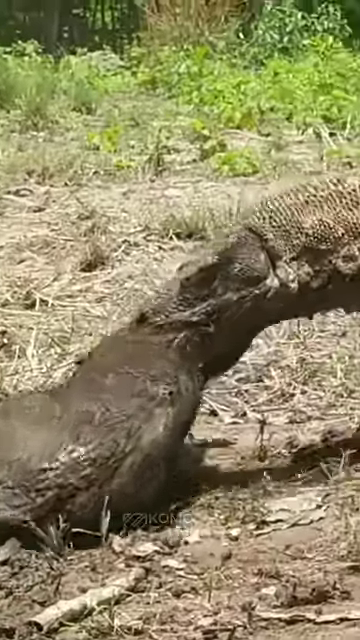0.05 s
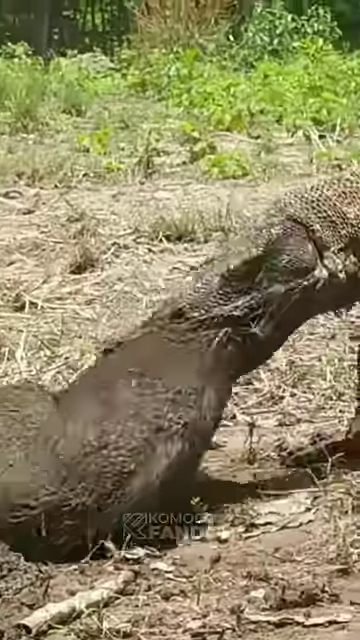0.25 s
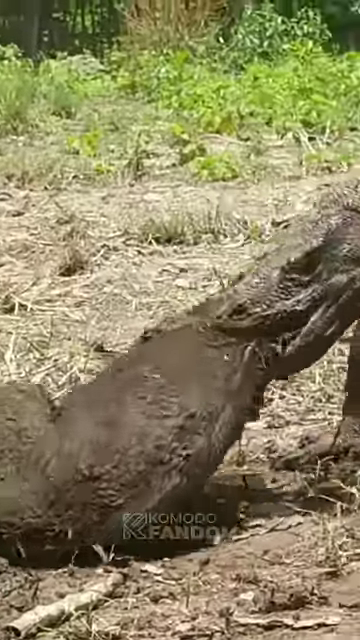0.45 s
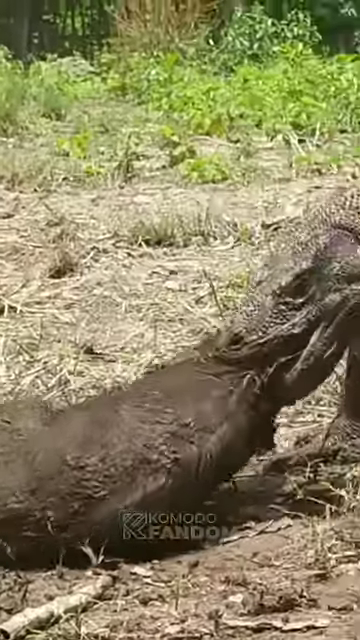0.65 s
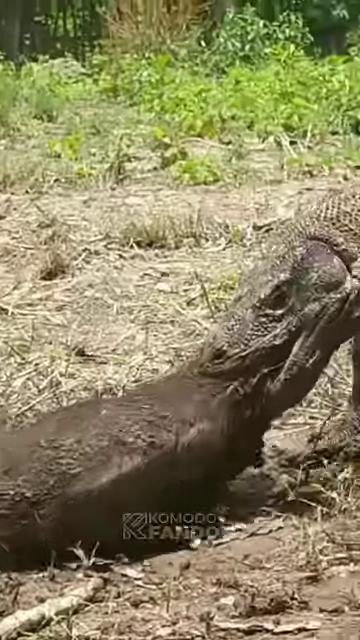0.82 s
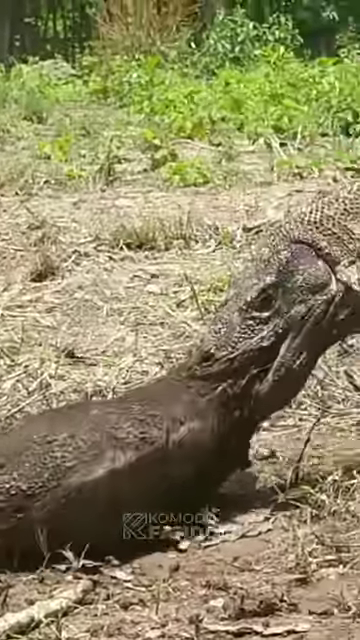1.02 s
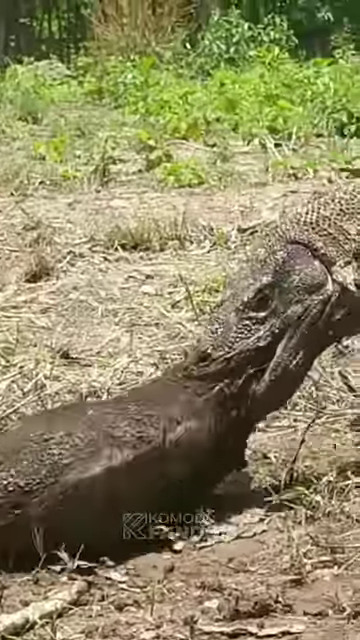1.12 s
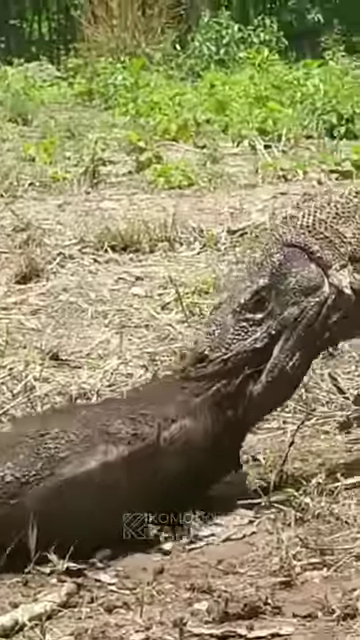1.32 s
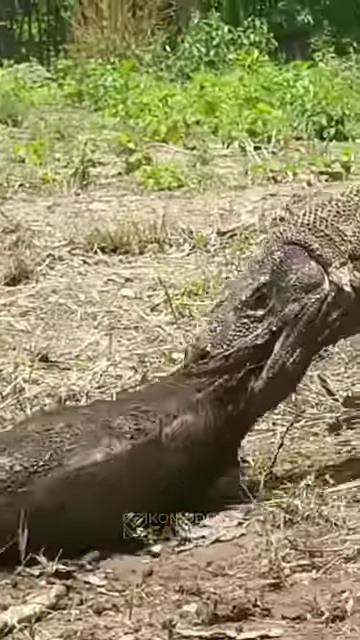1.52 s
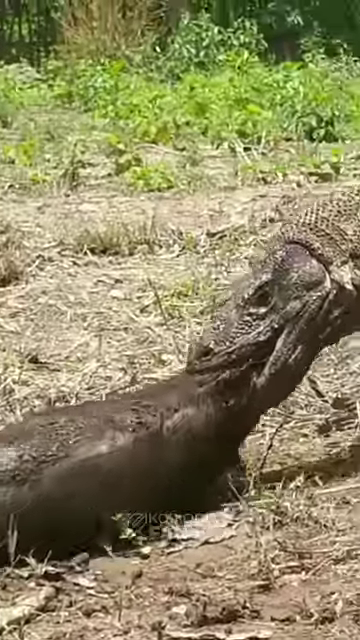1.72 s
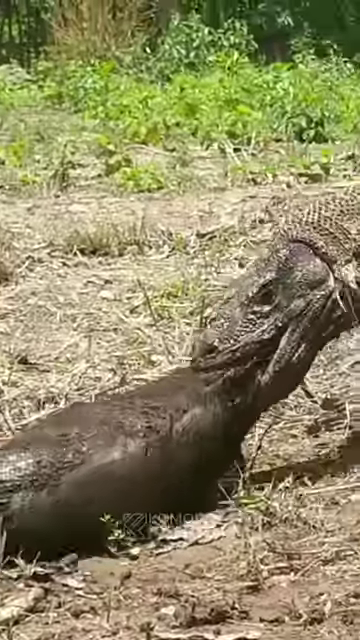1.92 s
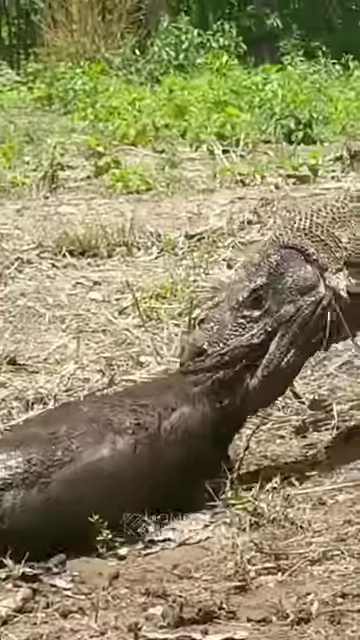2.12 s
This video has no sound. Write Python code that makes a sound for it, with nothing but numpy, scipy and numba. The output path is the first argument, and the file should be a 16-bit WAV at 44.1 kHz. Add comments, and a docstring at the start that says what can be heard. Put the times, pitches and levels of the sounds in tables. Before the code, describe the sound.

A large lizard gives a low rattling growl, then one long, breathy hiss.

```python
"""A low rattling growl, close and a little to the left, opens into one long hiss: a large lizard.
Slow flaps of its throat ring the chest and closed mouth, then dissolve into air as the wet jaws tick.
The breath rushes through the resonances of throat and mouth, buzzes and squeals as it gathers force,
whistles and stops short. Under it sit a low, even throb like a far idling engine and faint
outdoor air."""
import sys
import numpy as np
from scipy import signal
from scipy.fft import rfft, irfft
from scipy.io import wavfile
from scipy.ndimage import uniform_filter1d
from numba import njit

SR = 44100
rng = np.random.default_rng(int(sys.argv[2]) if len(sys.argv) > 2 else 0)


def wav_record(signal):
    """Record a signal, one row per channel, as 16-bit PCM in the file named by sys.argv[1]."""
    frames = np.transpose(np.atleast_2d(signal))
    bounded = np.clip(frames, -1, 1)
    # unit amplitude maps onto the largest positive 16-bit level
    quanta = np.round(bounded * 32767).astype(np.int16)
    wavfile.write(sys.argv[1], SR, quanta)


N = 94815
T = np.arange(N) / SR

# broad rush of breath (time [s], level [dB])
RUSH_LEVEL = [(0, -51.5), (.33, -52.5), (.44, -39), (.49, -31.5), (.6, -29), (.7, -27), (.79, -24.5),
              (1.1, -25.5), (1.35, -26.5), (1.7, -28.5), (1.83, -31.5), (1.895, -32.5), (1.92, -49),
              (2, -48.5), (2.07, -58), (2.15, -55)]
# its tone colour (frequency [Hz], level [dB])
RUSH_COLOUR = [(120, -27), (300, -6), (450, -6.5), (620, -1.5), (1000, -2), (1280, -2), (1550, 3.5),
               (2050, -1), (2400, 1.5), (2750, -1.5), (3600, -2.5), (4500, -18), (5050, -9), (5500, 0),
               (6300, -1), (7100, -2.5), (8000, -0.5), (9700, -11.5), (10200, -4.5), (10900, -6.5),
               (12500, -14), (13600, -10), (15300, -36)]
# four main resonances of the hiss and a side one at the cheek (time [s], centre [Hz], level [dB])
THROAT_BAND = [(.4, 950, -62), (.47, 980, -41), (.58, 817, -41.5), (.7, 850, -46.5), (.8, 770, -41.5),
               (1.05, 787, -46), (1.17, 884, -35), (1.3, 804.7, -37), (1.55, 792, -39.5),
               (1.75, 818.7, -44), (1.905, 811, -43), (1.925, 818, -64)]
MOUTH_BAND = [(.4, 1960, -53.5), (.57, 1830, -57), (.61, 1750, -41.5), (.8, 1860, -40.5), (.89, 1865, -46),
              (1.01, 1865, -34.5), (1.1, 2020, -49), (1.18, 1835, -51), (1.33, 1873, -46),
              (1.51, 1724, -38.5), (1.6, 1794, -40), (1.71, 1795, -35), (1.78, 1825, -33.5),
              (1.85, 1790, -33), (1.9, 1803, -34.5), (1.912, 1790, -76), (2.05, 1803, -83)]
JAW_BAND = [(.3, 3150, -58), (.43, 3270, -45), (.5, 3330, -31.5), (.59, 3390, -30), (.62, 3350, -33),
            (.7, 3610, -35), (.82, 3100, -35.5), (.9, 3280, -30), (1, 3430, -37.5), (1.07, 3300, -34.5),
            (1.42, 3520, -37.5), (1.53, 3540, -36.5), (1.7, 3470, -34.5), (1.87, 3470, -36),
            (1.92, 3410, -56), (2.05, 3280, -62)]
TEETH_BAND = [(.42, 8900, -53), (.48, 8640, -46.5), (.6, 8850, -45.5), (.68, 8300, -45), (.76, 8820, -33),
              (.85, 8530, -34), (.96, 8860, -36), (1.01, 8550, -27), (1.05, 8500, -34.5),
              (1.15, 8830, -32.5), (1.3, 8900, -37), (1.5, 8835, -38), (1.62, 9100, -40.5),
              (1.7, 9190, -36), (1.87, 9170, -43.5), (1.93, 8840, -73), (2.1, 9200, -66.5)]
CHEEK_BAND = [(.42, 4570, -50), (.5, 4580, -41), (.66, 3900, -56), (.8, 4250, -39.5), (.92, 4120, -38),
              (1.03, 4400, -38), (1.12, 4225, -42), (1.185, 3700, -37), (1.22, 4002, -33),
              (1.3, 4130, -38.5), (1.5, 3900, -39.5), (1.8, 4277, -52.5), (1.95, 4224, -59)]
# buzz of the throat (time [s], pitch [Hz], level [dB])
BUZZ = [(.46, 172, -39), (.52, 178.6, -40.5), (.6, 187.6, -33), (.645, 195.3, -30.5), (.745, 203.7, -29.5),
        (.79, 207.4, -34), (.86, 210.1, -35), (.95, 205.8, -32), (1.03, 209.1, -32), (1.15, 208.4, -47),
        (1.3, 198.9, -44.5), (1.55, 196.7, -43.5), (1.89, 205.9, -41), (1.93, 211.3, -99)]
# its grain (time [s], jitter [share of pitch], pulsing part of the hiss [0-1])
BUZZ_GRAIN = [(.5, .014, .1), (.6, .008, .2), (.635, .003, .75), (.745, .003, .8), (.78, .01, .28),
              (1.05, .009, .24), (1.2, .02, .26)]
# what the buzz rings (centre [Hz], width [Hz], level [dB])
BUZZ_MODES = [(373, 147, -4), (574, 120, -11.5), (806, 61, 9.5), (987, 39, -5.5), (1157, 120, -4),
              (1863, 94, 5), (2130, 39, 0.5), (3520, 660, -3), (4130, 310, 6.5), (5840, 1100, -15),
              (8400, 2700, 1)]
# growl (time [s], flap rate [Hz], level [dB], chest resonance [Hz], mouth resonance [Hz])
GROWL = [(0, 58, -33.5, 117, 546), (.14, 59, -32.5, 136, 565), (.21, 79, -31.5, 154, 583),
         (.245, 57.5, -29, 167, 606), (.29, 84, -35, 196, 574), (.4, 88, -36, 201, 586),
         (.45, 91, -43, 215, 560), (.52, 81, -50, 209, 580)]
# its breathiness (time [s], share of air [0-1])
GROWL_AIR = [(.14, .18), (.26, .3), (.35, .72)]
# the nearly closed throat (centre [Hz], width [Hz], level [dB])
GROWL_MODES = [(420, 140, -8.5), (515, 370, -10), (810, 486, 2), (1038, 350, 1), (1192, 77, -10.5),
               (1706, 135, -9.5), (3330, 180, -18.5), (9800, 1200, -26)]
# thin tones riding on the breath (time [s], pitch [Hz], level [dB])
SQUEAK = [(.2, 1310, -70), (.27, 1257, -49), (.39, 1292, -50), (.45, 1240, -48), (.5, 1196, -52)]  # over the growl
MOUTH_WHISTLE = [(.78, 1851, -36.5), (.88, 1894, -29.5), (.96, 1904, -34.5), (1.02, 1913, -32.5),
                 (1.1, 1963, -42), (1.18, 1902, -42), (1.26, 1873, -32), (1.34, 1845, -32),
                 (1.43, 1795, -32), (1.51, 1740, -49), (1.58, 1700, -29.5), (1.65, 1670, -30),
                 (1.72, 1655, -28.5), (1.76, 1575, -39.5), (1.83, 1512, -41.5), (1.89, 1390, -55)]  # the mouth resonance tips into a tone
TEETH_WHISTLE = [(.6, 7910, -41), (.67, 8100, -33.5), (.77, 8810, -35), (.9, 8530, -39), (1.03, 8380, -32),
                 (1.2, 8390, -38), (1.5, 8220, -38.5), (1.6, 8470, -58)]  # a shrill edge
# a bright overtone of the throat buzz squeals near 3.5 kHz; a thin whistle follows later
# (time [s], pitch [Hz], level [dB])
SQUEAL_THEN_WHISTLE = [(.47, 3200, -44), (.53, 3260, -39), (.595, 3370, -33), (.62, 3490, -24.5),
                       (.68, 3560, -32.5), (.75, 3700, -39), (.8, 3740, -65), (1.42, 3500, -43),
                       (1.52, 3520, -29.5), (1.6, 3480, -30), (1.7, 3330, -37), (1.85, 3230, -44),
                       (1.9, 3200, -69)]
# wet ticks of the mouth (time [s], peak level [dB], ring [Hz])
TICKS = [(0.103, -39.5, 3440), (.1336, -35, 9600), (.168, -33, 3250), (0.226, -39, 3150),
         (0.2422, -32, 8850), (.28, -32.5, 3060), (0.35, -32, 3220), (0.3835, -35, 9700),
         (.386, -29.5, 3580), (0.4413, -27.5, 3150), (.4649, -24, 8900), (0.466, -22.5, 3360),
         (0.4763, -17.5, 9300)]
# fine crackle of saliva (time [s], level [dB])
CRACKLE_LEVEL = [(0, -61), (.12, -60.5), (.25, -59), (.32, -63.5), (.39, -56), (.47, -65), (.55, -70),
                 (.7, -63)]
# what each throb rings (frequency [Hz], decay [s], level [dB])
THROB_MODES = [(69.4, 0.057, 9), (121.5, 0.025, 1), (179, 0.0078, -4), (220, 0.0014, -8)]
# tone colour of the outdoor air (frequency [Hz], level [dB])
AIR_COLOUR = [(25, -25), (60, 13.5), (130, 2.5), (240, -3), (330, -10), (700, -28), (1400, -38),
              (4000, -12.5), (10000, -28), (15000, -24)]

FLUTTER_DB, FLUTTER_HZ, RASP_DB, RASP_HZ = 1.67, 45, 1.4, 333
CATCH_AT_S, CATCH_HALF_S, CATCH_DB = .42, .0035, -7
SMEAR_S, RUSH_SPLIT_HZ = .0045, 2330
CHEST_DB, PUFF_DB, PUFF_DECAY_CYCLES = -6.5, 4.5, .79
TICK_DECAY_CYCLES, CRACKLE_PER_S, CRACKLE_SCATTER_DB = 9.6, 310, 2
THROB_HZ, THROB_FIRST_S, THROB_DB, AIR_DB = 11.56, .065, -51, -52.5
TAIL_DECAY_S, TAIL_DB, TOP_HZ = .046, -3, 15200


def undb(db):
    """Decibels to gain."""
    return 10 ** (np.asarray(db) / 20)


def unit(x):
    """Scale to rms 1."""
    return x / np.sqrt(np.mean(x ** 2))


def curves(table):
    """Each column of a timed table as an automation curve."""
    rows = np.array(table, float)
    return [np.interp(T, rows[:, 0], col) for col in rows.T[1:]]


def during(table):
    """A gate, open from the first row of a timed table to the last."""
    return (T >= table[0][0]) & (T <= table[-1][0])


def wobble(hz):
    """Smooth random modulation, rms 1."""
    drift = np.interp(T * hz, np.arange(N // 10), rng.standard_normal(N // 10))
    return unit(uniform_filter1d(drift, max(int(SR / hz), 2) // 2))


@njit
def bandpass(x, hz, width_hz):
    """State-variable band-pass with a moving centre."""
    y, band_state, low_state = np.empty(len(x)), 0., 0.
    for i in range(len(x)):
        g, damping = np.tan(np.pi * hz[i] / SR), width_hz / hz[i]
        band = (band_state + g * (x[i] + 1e-18 - low_state)) / (1 + g * (g + damping))
        band_state, low_state = 2 * band - band_state, low_state + 2 * g * band
        y[i] = damping * band
    return y


def ring(x, hz, width_hz):
    """A resonance with steep far skirts, rms 1."""
    hz = hz + np.zeros(N)
    return unit(bandpass(bandpass(x, hz, float(width_hz)), hz, 9.2 * width_hz))


def colour(x, points):
    """EQ a sound along (frequency [Hz], level [dB]) points, rms 1."""
    hz, db = np.array(points, float).T
    f = np.maximum(np.fft.rfftfreq(N, 1 / SR), 1)
    return unit(irfft(rfft(x) * undb(np.interp(np.log(f), np.log(hz), db)), N))


def place(mid, side=0, *, pan_db, spread=0):
    """Mid and side to stereo; a positive pan leans left."""
    signs = np.array([[1], [-1]])
    return (mid + spread * signs * side) * undb(signs * pan_db / 2)


def pulses(hz, jitter, scatter_db):
    """One uneven pulse a cycle, and the phase within the cycle."""
    turns = np.cumsum(hz * (1 + jitter * wobble(80))) / SR
    cycle = np.arange(int(turns[-1]) + 1)
    at = np.interp(cycle, turns, np.arange(N))
    size = undb(scatter_db * rng.standard_normal(N // 100))[cycle]
    taps = at.astype(int)[:, None] + np.arange(-4, 5)
    train = np.zeros(N)
    np.add.at(train, np.clip(taps, 0, N - 1), size[:, None] * np.sinc(taps - at[:, None]))
    return train, turns % 1


def hiss():
    """One fluttering, rasping breath, partly chopped by the throat, feeds a rush and five resonances."""
    jitter, pulsing = curves(BUZZ_GRAIN)
    flaps = unit(pulses(curves(BUZZ)[0], jitter, scatter_db=.8)[0])
    soft_flaps = smear(flaps, SMEAR_S)
    force = undb(FLUTTER_DB * wobble(FLUTTER_HZ) + RASP_DB * wobble(RASP_HZ))
    turbulence = np.sqrt(1 - pulsing) * force * rng.standard_normal((2, N))
    stream = turbulence + np.sqrt(pulsing) * np.array([smear(flaps, 2 * SMEAR_S), soft_flaps])
    # the air catches for an instant as the hiss starts
    catch = undb(CATCH_DB * np.exp(-((T - CATCH_AT_S) / CATCH_HALF_S) ** 2))
    return catch * (rush(stream, pulsing) + buzz(soft_flaps)
                    + resonance(THROAT_BAND, stream, width_hz=110, waver_db=.7, pan_db=.5, spread=.15)
                    + resonance(MOUTH_BAND, stream, width_hz=100, waver_db=1.8, pan_db=-2.5, spread=.27)
                    + resonance(JAW_BAND, stream, width_hz=300, waver_db=1, pan_db=4, spread=.2)
                    + resonance(CHEEK_BAND, stream, width_hz=430, waver_db=4.5, pan_db=5, spread=1)
                    + resonance(TEETH_BAND, stream, width_hz=1040, waver_db=1, pan_db=15, spread=.52))


def rush(stream, pulsing):
    """The body of the breath: its treble is wide, its lows are centred and give way to the buzz."""
    air = undb(curves(RUSH_LEVEL)[0]) * colour(stream, RUSH_COLOUR)
    low = signal.sosfiltfilt(signal.butter(2, RUSH_SPLIT_HZ, fs=SR, output="sos"), air)
    treble = air - low
    ducked_low = low * np.sqrt(1 - pulsing)
    return undb(-3) * (place(*treble, pan_db=4, spread=.92) + place(*ducked_low, pan_db=.5, spread=.28))


def resonance(table, stream, width_hz, waver_db, pan_db, spread):
    """The breath rings one gliding, wavering resonance of the airway."""
    hz, db = curves(table)
    hz = hz * (1 + .009 * wobble(45))
    mid, side = [ring(x, hz, width_hz) for x in stream]
    level = during(table) * undb(db + waver_db * wobble(44.85))
    return level * place(mid, side, pan_db=pan_db, spread=spread)


def buzz(flaps):
    """The throat vibrates as the air gathers force, then turns ragged; its high resonances lean left."""
    voice = sum(place(undb(db) * ring(flaps, hz, width), pan_db=1.4 * hz / 1000)
                for hz, width, db in BUZZ_MODES)
    return during(BUZZ) * undb(curves(BUZZ)[1]) * unit(voice)


def smear(x, top_delay_s):
    """The airway delays the treble behind the bass, which spreads each pulse over its cycle."""
    f = np.fft.rfftfreq(N, 1 / SR)
    delay = top_delay_s * np.sqrt(2 * f / SR)
    return irfft(rfft(x) * np.exp(-2j * np.pi * np.cumsum(delay) * SR / N), N)


def growl():
    """Slow flaps of the throat ring the chest and the closed mouth, then dissolve into rushing air."""
    flap_hz, db, chest_hz, mouth_hz = curves(GROWL)
    air = curves(GROWL_AIR)[0]
    flaps, phase = pulses(flap_hz, jitter=.008, scatter_db=1.2)
    puff_shape = np.exp(-phase * (1 - air) / PUFF_DECAY_CYCLES)
    puffs = undb(PUFF_DB) * np.sqrt(air) * unit(puff_shape * rng.standard_normal((2, N)))

    def body(x):
        """Throat, mouth and chest ring side by side; the throat modes alternate in polarity."""
        throat = sum((-1) ** (k + 1) * undb(mode_db) * ring(x, hz, width)
                     for k, (hz, width, mode_db) in enumerate(GROWL_MODES))
        mouth = undb(4.5) * np.sqrt(air) * ring(x, mouth_hz, width_hz=73)
        chest = undb(CHEST_DB) * ring(x, chest_hz, width_hz=35)
        return unit(chest + mouth + throat)
    drive = np.sqrt(1 - air) * unit(flaps) + puffs[0]
    return during(GROWL) * undb(db) * place(body(drive), body(puffs[1]), pan_db=1.4, spread=.23)


def thin_tone(table, wander, waver_db, pan_db):
    """A pure gliding tone, unsteady in pitch and level."""
    hz, db = curves(table)
    hz = hz * (1 + wander * wobble(220))
    tone = np.sqrt(2) * np.sin(2 * np.pi * np.cumsum(hz) / SR)
    level = during(table) * undb(db + waver_db * wobble(90.4))
    return place(level * tone, pan_db=pan_db)


def squeals_and_whistles():
    """The squeak of the growl, the squeal of the buzz and the whistles of the hiss."""
    return (thin_tone(SQUEAK, wander=.012, waver_db=3, pan_db=1.5)
            + thin_tone(MOUTH_WHISTLE, wander=.0117, waver_db=-.5, pan_db=4.5)
            + thin_tone(SQUEAL_THEN_WHISTLE, wander=.0079, waver_db=-.5, pan_db=6)
            + thin_tone(TEETH_WHISTLE, wander=.011, waver_db=3, pan_db=11.5))


def ticks():
    """Wet ticks as the mouth parts; the higher, the shorter."""
    track = np.zeros(N)
    for start, db, hz in TICKS:
        envelope = (T >= start) * np.exp(-np.abs(T - start) * hz / TICK_DECAY_CYCLES)
        tick = ring(envelope * rng.standard_normal(N), hz, width_hz=.11 * hz)
        track += undb(db) * tick / np.abs(tick).max()
    return place(track, pan_db=10.5)


def crackle():
    """Tiny bright bursts of saliva while the jaws part."""
    pops = rng.random(N) < CRACKLE_PER_S / SR
    sizes = undb(CRACKLE_SCATTER_DB * np.minimum(rng.exponential(size=N), 3))
    level = during(CRACKLE_LEVEL) * undb(curves(CRACKLE_LEVEL)[0])
    return place(level * ring(pops * sizes, hz=9300, width_hz=2400), pan_db=17)


def scatter(sound):
    """Ground and plants throw back a short, bright tail."""
    t = T[:SR // 2]
    tail = rng.standard_normal((2, len(t))) * np.exp(-t / TAIL_DECAY_S)
    tail = signal.sosfilt(signal.butter(2, 2000, "high", fs=SR, output="sos"), tail)
    tail /= np.sqrt(np.sum(tail ** 2, axis=1, keepdims=True))
    return undb(TAIL_DB) * signal.fftconvolve(sound, tail, axes=1)[:, :N]


def throb():
    """Even, muffled thumps, like a far idling engine."""
    beats = np.zeros(N + SR)  # a second of pre-roll, so the throb is already running
    at = ((THROB_FIRST_S + np.arange(-5, 30) / THROB_HZ + 1) * SR).astype(int)
    sizes = undb(.44 * rng.standard_normal(len(at)))
    inside = at < len(beats)
    beats[at[inside]] = sizes[inside]
    t = T[:SR // 2]
    thump = sum(-undb(db) * np.exp(-t / decay) * np.sin(2 * np.pi * hz * t)
                for hz, decay, db in THROB_MODES)
    thumps = unit(signal.fftconvolve(np.diff(beats, prepend=0), thump)[SR:SR + N])
    muffled = signal.sosfilt(signal.butter(4, 270, fs=SR, output="sos"), thumps)
    return place(undb(THROB_DB) * muffled, pan_db=2)


def outdoor_air():
    """A faint bed of noise: low rumble with a little sheen on top."""
    mid, side = undb(AIR_DB) * colour(rng.standard_normal((2, N)), AIR_COLOUR)
    return place(mid, side, pan_db=.5, spread=.15)


def scene():
    """The lizard up front with its short tail, over the throb and the air."""
    lizard = growl() + hiss() + squeals_and_whistles() + ticks() + crackle()
    return lizard + scatter(lizard) + throb() + outdoor_air()


def record(dry):
    """A steep low-pass takes off the very top."""
    return signal.sosfilt(signal.ellip(8, .2, 70, TOP_HZ, fs=SR, output="sos"), dry)


dry = scene()
out = record(dry)
wav_record(out)
```